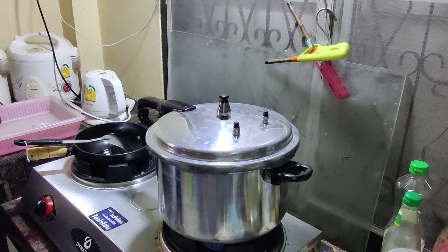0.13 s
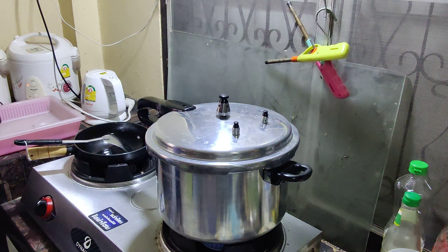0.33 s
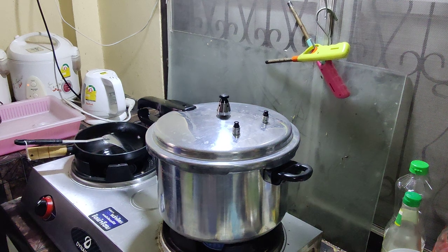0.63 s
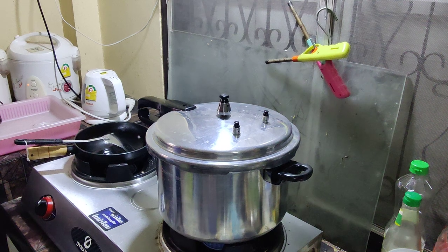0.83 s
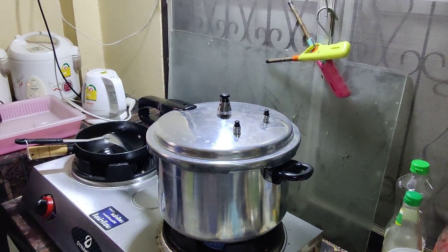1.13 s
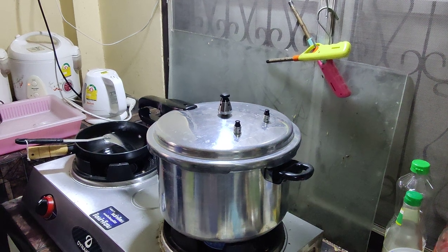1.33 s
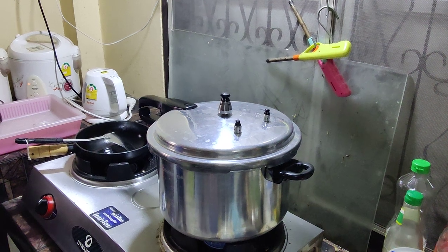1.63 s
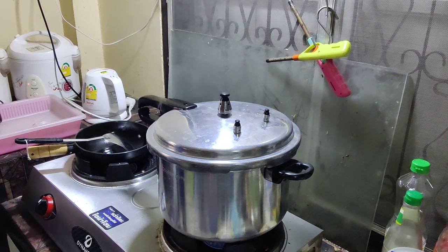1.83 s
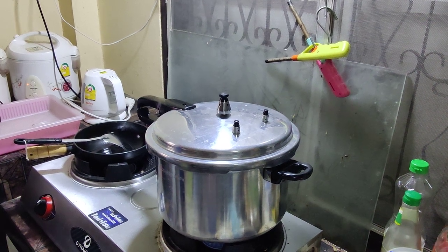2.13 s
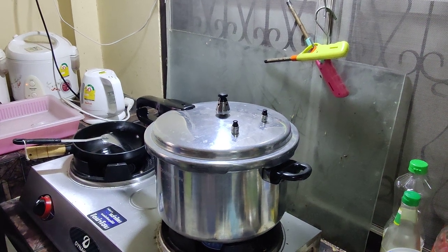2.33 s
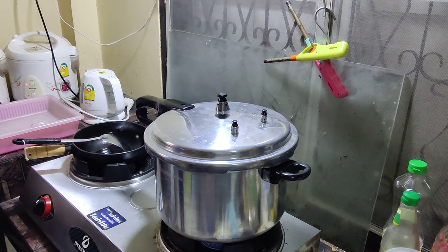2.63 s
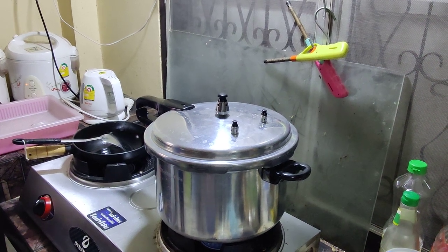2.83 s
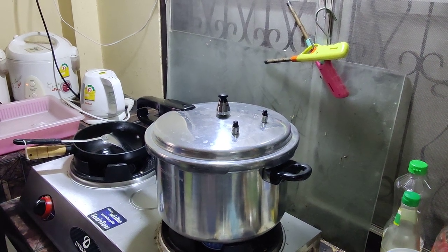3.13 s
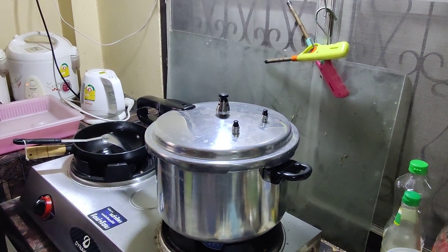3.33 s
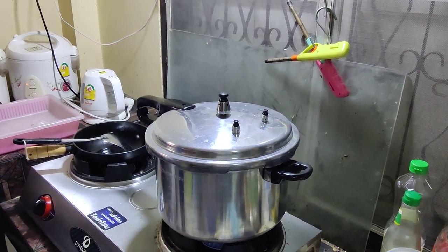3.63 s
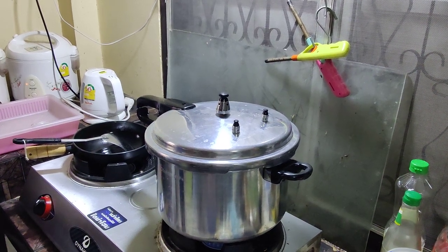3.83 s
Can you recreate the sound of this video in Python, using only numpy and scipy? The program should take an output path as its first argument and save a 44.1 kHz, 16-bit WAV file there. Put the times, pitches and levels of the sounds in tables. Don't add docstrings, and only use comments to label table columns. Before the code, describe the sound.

Pressure cooker steam chuffs almost four times a second over stove hiss and low rumble

```python
import sys
import numpy as np
from scipy import signal
from scipy.fft import rfft, irfft
from scipy.io import wavfile
from scipy.ndimage import uniform_filter1d, minimum_filter1d

SR = 44100
rng = np.random.default_rng(int(sys.argv[2]) if len(sys.argv) > 2 else 0)


def invert_db(x):
    u = np.asarray(x, float) / 20
    return 10 ** u


def to_wav(s):
    ch = np.atleast_2d(s).T
    pcm = np.round(np.clip(ch, -1, 1) * 32767)
    wavfile.write(sys.argv[1], SR, pcm.astype(np.int16))


N = 176400
T_S = np.arange(N) / SR


def rms_one(x):
    return x / np.sqrt(np.mean(x ** 2) + 1e-20)


def at_hz(points, hz):
    table_hz, table_db = np.array(points)[:, 0], np.array(points)[:, 1]
    return np.interp(np.log(np.maximum(hz, 1)), np.log(table_hz), table_db)


def colour(x, gain_at):
    return irfft(rfft(x) * gain_at(np.fft.rfftfreq(N, 1 / SR)), N)


def drift(rate_hz):
    pole = np.exp(-80 * np.pi * rate_hz / SR)
    noise = rng.standard_normal(N // 40 + 2002)
    slow = signal.lfilter([1], [1, -2 * pole, pole * pole], noise)[2000:]
    return np.interp(np.arange(N) / 40, np.arange(len(slow)), rms_one(slow))


def tone(hz):
    return np.sqrt(2) * np.sin(2 * np.pi * np.cumsum(hz) / SR)


def reflections(t60_s):
    t = np.arange(SR // 2) / SR
    h = rng.standard_normal((2, len(t))) * invert_db(-60 * t / t60_s) * (t > .001)
    return h / np.sqrt(np.sum(h ** 2, axis=1, keepdims=True))


START_S, FADE_S, BASS_FADE_S, FADE_POWER = 0.058, 0.98, 0.77, 0.8


def fade(length_s):
    return np.clip((T_S - START_S) / length_s, 0, 1) ** FADE_POWER


# frequency in Hz, level in dB per Hz.
FLAME_SPECTRUM = [(25, -6.5), (90, -7), (170, -17), (300, -19), (620, -24), (1000, -20), (1400, -22.5),
                  (2800, -21)]
# frequency in Hz, left-right correlation [-1..1].
FLAME_LIKENESS = [(60, 0.81), (180, 1), (550, 0.38), (1650, -0.18), (4970, 0.23), (15000, -0.36)]
FLAME_DB, FLAME_TOP_HZ, FLAME_FLICKER_DB, STREET_SWELL_DB_PER_S = -41, 3700, 0.5, 1.13


def flame():
    def shape(hz):
        return invert_db(at_hz(FLAME_SPECTRUM, hz)) / (1 + (hz / FLAME_TOP_HZ) ** 4) * (hz > 20)

    def alike(hz):
        return np.clip(at_hz(FLAME_LIKENESS, hz), -.99, .99)

    mid = colour(rng.standard_normal(N), lambda hz: shape(hz) * np.sqrt(1 + alike(hz)))
    side = colour(rng.standard_normal(N), lambda hz: shape(hz) * np.sqrt(1 - alike(hz)))
    level_db = FLAME_DB + STREET_SWELL_DB_PER_S * T_S + FLAME_FLICKER_DB * drift(3)
    return invert_db(level_db) * rms_one(np.array([mid + side, mid - side]))


# time in seconds, pitch in Hz, level in dB.
LONG_ROOM_MODE = [(0.1, 36.8, -57), (0.34, 36.7, -39), (0.65, 39.7, -52), (0.83, 36.1, -38),
                  (1.03, 39, -35.5), (1.4, 38, -28), (1.46, 39.7, -38), (2.32, 38.45, -36.5),
                  (2.57, 38.7, -31), (2.7, 37.07, -19), (2.83, 36.1, -21.5), (3.0, 35.73, -39.5),
                  (3.25, 35.44, -38), (3.38, 36.37, -16.5), (3.59, 38.15, -25.5), (3.66, 38.26, -20.5),
                  (3.89, 39.86, -33), (4.0, 39.5, -35)]
# time in seconds, pitch in Hz, level in dB.
SHORT_ROOM_MODE = [(0.1, 58.5, -68), (0.24, 61.4, -47.5), (0.5, 64, -32.5), (0.67, 61, -27.5),
                   (1.35, 61.66, -39.5), (1.41, 60.6, -32), (1.57, 64.47, -61), (1.64, 64.6, -34.5),
                   (1.73, 61.35, -46), (1.99, 63.4, -27), (2.18, 65.2, -32.5), (2.35, 62.1, -25.5),
                   (2.57, 60.24, -38), (3.03, 63.7, -25.5), (3.29, 64.5, -37), (3.4, 61.46, -35),
                   (3.91, 59.6, -37), (4.0, 61.4, -37)]
MODE_ROUGHNESS, MODE_WANDER_HZ = .22, 1.3


def rumble():
    out = 0
    for mode in LONG_ROOM_MODE, SHORT_ROOM_MODE:
        when_s, hz, db = np.transpose(mode)
        strength = invert_db(np.interp(T_S, when_s, db)) * (1 + MODE_ROUGHNESS * drift(6.9))
        pitch_hz = np.interp(T_S, when_s, hz) + MODE_WANDER_HZ * drift(6.3)
        out = out + strength * tone(pitch_hz) / np.maximum(fade(BASS_FADE_S), .05)
    return out


# frequency in Hz, width in Hz, level in dB.
HUM_LINES = [(117.3, 2.24, -46), (198.6, 3.95, -56), (268, 6.8, -58.5), (300, 2.02, -57.5),
             (358.5, 2.93, -62)]


def hum():
    out = 0
    for hz, width_hz, db in HUM_LINES:
        strength = 1 + 0.33 * drift(width_hz)
        out = out + invert_db(db) * rms_one(strength * tone(hz + width_hz / 2 * drift(width_hz)))
    return out


# time of the peak in seconds, level in dB.
WEIGHT_TIPS = [(0.227, -45.5), (0.484, -39.5), (0.752, -36.5), (1.024, -33.5), (1.288, -35), (1.557, -34),
               (1.823, -34), (2.092, -33), (2.36, -33.5), (2.625, -33), (2.904, -34), (3.179, -33.5),
               (3.258, -49), (3.454, -34.5), (3.727, -34), (3.998, -33.5)]
# frequency in Hz, level in dB per Hz.
PUFF_SPECTRUM = [(1200, -19), (2200, -9.5), (3300, -7), (4700, -6), (6500, -1), (7800, -6.5), (10500, -17),
                 (15300, -12)]
# frequency in Hz, level in dB per Hz.
LEAK_SPECTRUM = [(1500, 1), (3000, -45), (4500, 8), (6500, 11), (7600, 4.5), (10300, -34), (12500, -58),
                 (15300, 7)]
# frequency in Hz, width in Hz, level in dB.
VENT_TONES = [(5200, 96, -22.5), (6320, 13, 12.5), (6510, 33, -27.5), (7300, 28, -3), (7570, 90, -5),
              (8100, 24, 23), (8130, 17, 4)]
VENT_DB = -15.5
PUFF_RISE_DB_PER_S, PUFF_FALL_DB_PER_S, PUFF_ROUND_S = 130, 184, .02
LEAK_DB, LEAK_RISE_DB_PER_S, SPUTTER_DB, SPUTTER_PER_S = -48, 3.2, 1, 13.3
EARLY_DB, EARLY_T60_S, LATE_DB, KITCHEN_T60_S, WALL_CUT_HZ = 5.5, 0.09, -9, 0.95, 14000
SCATTER_DB, LEFT_LAG_S = 4, .00045


def jet_noise(spectrum):
    def gain(hz):
        vent = 1
        for f, width_hz, db in VENT_TONES:
            vent = vent + invert_db(VENT_DB + db) / (1 + (2 * (hz - f) / width_hz) ** 2)
        return invert_db(at_hz(spectrum, hz)) * vent * (hz > 600)

    return rms_one(colour(rng.standard_normal((4, N)), gain))


def steam():
    opening, fade_gain = 0, fade(FADE_S)
    for peak_s, db in WEIGHT_TIPS:
        slope = np.where(T_S < peak_s, -PUFF_RISE_DB_PER_S, PUFF_FALL_DB_PER_S)
        heard_gain = np.maximum(np.interp(peak_s, T_S, fade_gain), .05)
        opening = opening + invert_db(db - slope * (T_S - peak_s)) / heard_gain
    opening = uniform_filter1d(opening, int(PUFF_ROUND_S * SR))
    leak_gain = invert_db(LEAK_DB + LEAK_RISE_DB_PER_S * (T_S - 2.5))
    source = opening * jet_noise(PUFF_SPECTRUM) + leak_gain * jet_noise(LEAK_SPECTRUM)
    source = source * invert_db(SPUTTER_DB * drift(SPUTTER_PER_S))

    near = invert_db(EARLY_DB) * reflections(EARLY_T60_S)
    near[0, int(LEFT_LAG_S * SR)] += 1
    near[1, 0] += 1
    wall_loss = signal.butter(1, WALL_CUT_HZ, fs=SR, output="sos")
    late = invert_db(LATE_DB) * signal.sosfilt(wall_loss, reflections(KITCHEN_T60_S))
    heard = signal.fftconvolve(source[:1], near, axes=1)[:, :N]
    heard = heard + signal.fftconvolve(source[1:2], late, axes=1)[:, :N]
    return (heard + invert_db(SCATTER_DB) * source[2:]) / 2


# time of the loud fall in seconds, level in dB, stretch of the fall,
# level of the lead note in dB, how much earlier the lead starts in seconds.
BIRD_CALLS = [
    (2.032, -41, 1.15, -55.5, .1),
    (2.382, -37, .95, -45, 0.082),
    (2.72, -36.5, 0.96, -48.5, 0.093),
    (3.087, -35.5, 1.06, -50, .11),
    (3.472, -37.5, 1.0, -52, 0.1),
]
# time from the call in seconds, pitch in Hz, level in dB.
FALLING_WHISTLE = [(-.03, 4450, -30), (-.018, 4100, -19), (-.009, 3780, -14), (-.004, 3520, -2),
                   (.008, 2980, 0), (.02, 2700, -4), (.032, 2450, -2), (.04, 2330, -30)]
LEAD_HZ, LEAD_S, LEAD_FLUTTER, LEAD_WANDER_HZ = 5060, .065, .3, 45
FAR_BIRD_S, FAR_BIRD_LENGTH_S, FAR_BIRD_HZ, FAR_BIRD_DB, TRILL_PER_S = 1.84, .12, 2950, -49, 90
BIRD_PAN_DB, BIRD_ROOM_DB, BIRD_T60_S, WINDOW_DB, WINDOW_T60_S = -3, 1, .4, -1, .07


def note_swell(start_s, length_s):
    return np.sin(np.pi * np.clip((T_S - start_s) / length_s, 0, 1)) ** .5


def far_bird():
    note = tone(FAR_BIRD_HZ + LEAD_WANDER_HZ * drift(29.94))
    trill = np.sin(np.pi * TRILL_PER_S * T_S) ** 2
    return invert_db(FAR_BIRD_DB) * note_swell(FAR_BIRD_S, FAR_BIRD_LENGTH_S) * note * trill


def near_bird():
    when_s, hz, db = np.transpose(FALLING_WHISTLE)
    out = np.zeros(N)
    for call_s, call_db, stretch, lead_db, lead_early_s in BIRD_CALLS:
        at_s = (T_S - call_s) / stretch
        whistle_gain = invert_db(call_db + np.interp(at_s, when_s, db, -200, -200))
        out += whistle_gain * tone(np.interp(at_s, when_s, hz))
        lead_gain = invert_db(lead_db) * note_swell(call_s - lead_early_s, LEAD_S)
        flutter = 1 + LEAD_FLUTTER * drift(61)
        out += lead_gain * flutter * tone(LEAD_HZ + LEAD_WANDER_HZ * drift(42.7))
    return out


def birds():
    dry_birds = far_bird() + near_bird()
    echoes = invert_db(BIRD_ROOM_DB) * reflections(BIRD_T60_S)
    echoes = echoes + invert_db(WINDOW_DB) * reflections(WINDOW_T60_S)
    wet = signal.fftconvolve(dry_birds[None], echoes, axes=1)[:, :N]
    return dry_birds * invert_db([[BIRD_PAN_DB / 2], [-BIRD_PAN_DB / 2]]) + wet


def scene():
    return flame() + rumble() + hum() + steam() + birds()


# frequency in Hz, threshold in dB.
GATE_THRESHOLD = [(4300, -12), (4900, -4.8), (5600, -6), (6500, -8), (7800, -3.6), (13000, -3.2),
                  (14800, -6)]
GATE_DEPTH_DB = -30


def gate(x):
    hz, _, z = signal.stft(x, SR, nperseg=2048, noverlap=1024)
    power = uniform_filter1d(np.abs(z) ** 2, size=2, axis=2)
    around = uniform_filter1d(power, size=48, axis=1)
    ratio = uniform_filter1d(power, size=6, axis=1) / (around + 1e-24)
    threshold = invert_db(2 * at_hz(GATE_THRESHOLD, hz))[:, None]
    shut = 1 / (1 + (ratio / threshold) ** 30) * (hz > GATE_THRESHOLD[0][0])[:, None]
    shut = -minimum_filter1d(-shut, size=5, axis=1)
    return signal.istft(z * invert_db(GATE_DEPTH_DB * shut), SR, nperseg=2048, noverlap=1024)[1][:, :N]


def low_pass(x):
    return signal.sosfilt(signal.butter(12, 16230, fs=SR, output="sos"), x)


# frequency in Hz, difference in dB.
PORT_DIFFERENCE = [(900, -0.5), (2300, -6), (3500, -7), (6000, 0), (7600, -8.5), (9500, -7), (12500, -3.5),
                   (15000, -2.5)]
CUTOFF_HZ, BASS_HZ = 15505, 338


def record(dry):
    sign = np.array([[1], [-1]])
    x = colour(dry, lambda hz: invert_db(at_hz(PORT_DIFFERENCE, hz) / 2 * sign) * (hz < CUTOFF_HZ))
    bass = colour(x, lambda hz: 1 / (1 + (hz / BASS_HZ) ** 2))
    mix = bass * fade(BASS_FADE_S) + (x - bass) * fade(FADE_S)
    return low_pass(gate(mix))


dry = scene()
out = record(dry)
to_wav(out)
```